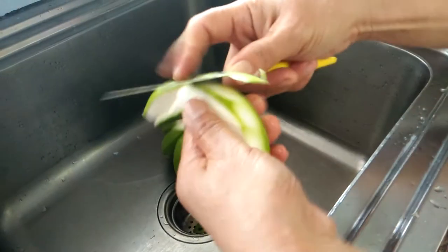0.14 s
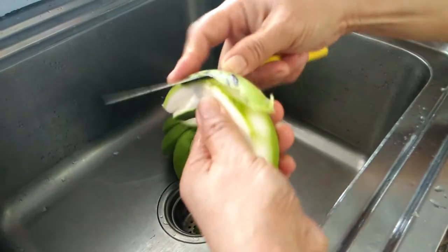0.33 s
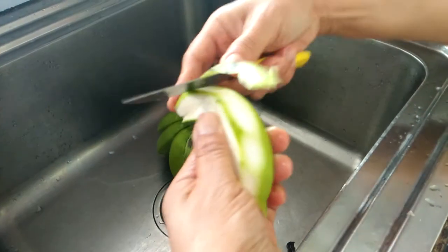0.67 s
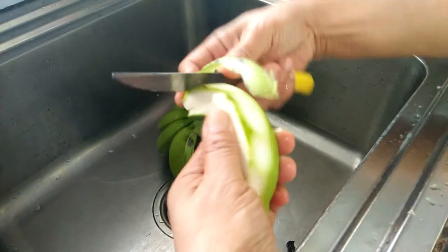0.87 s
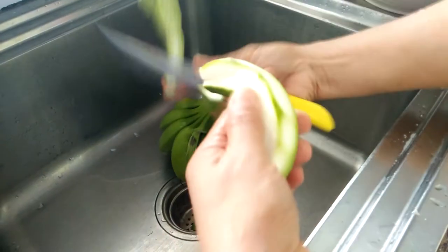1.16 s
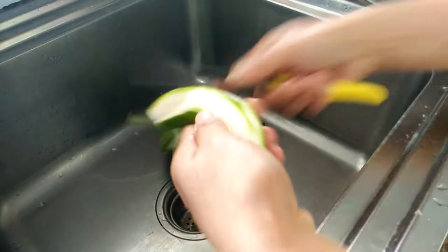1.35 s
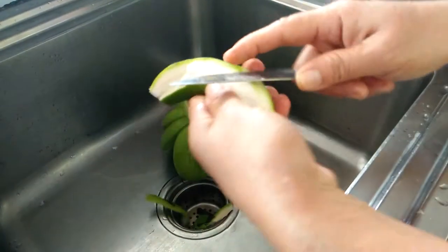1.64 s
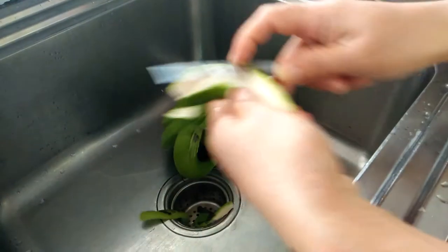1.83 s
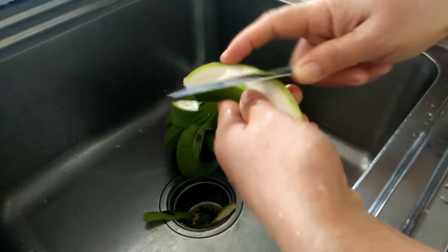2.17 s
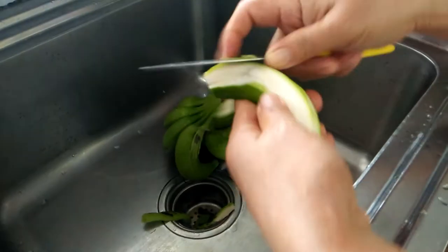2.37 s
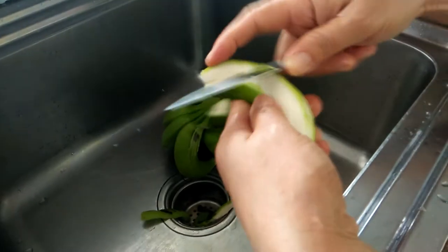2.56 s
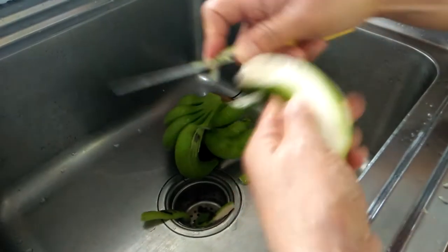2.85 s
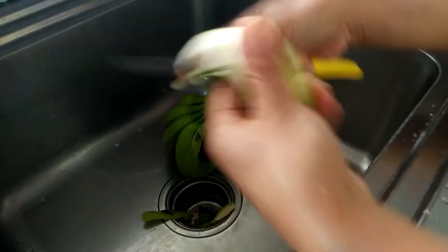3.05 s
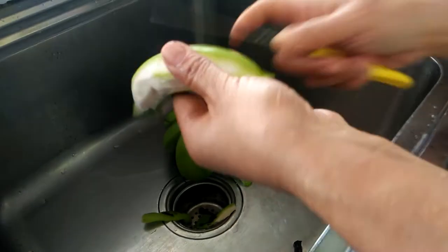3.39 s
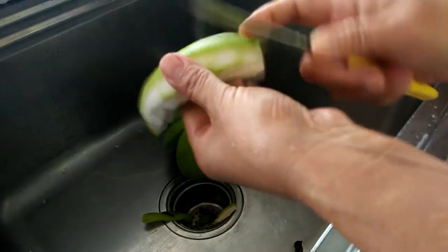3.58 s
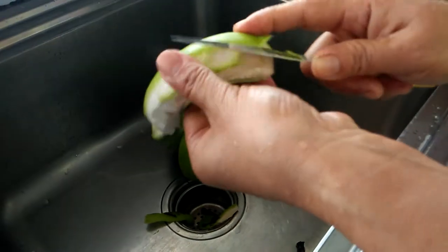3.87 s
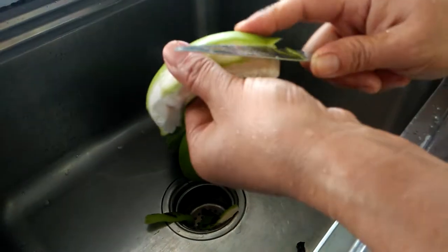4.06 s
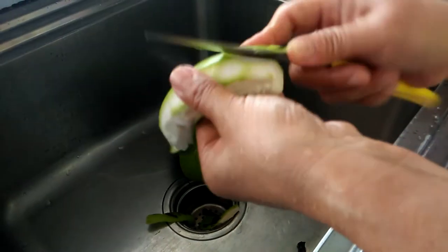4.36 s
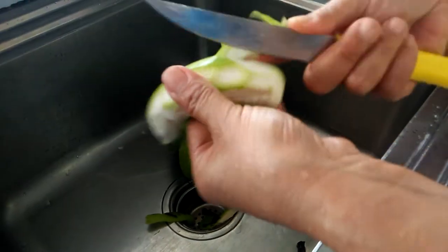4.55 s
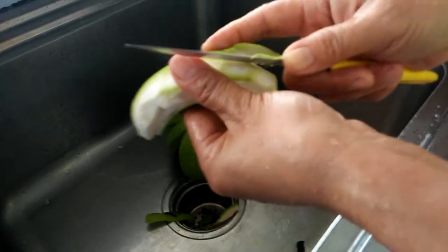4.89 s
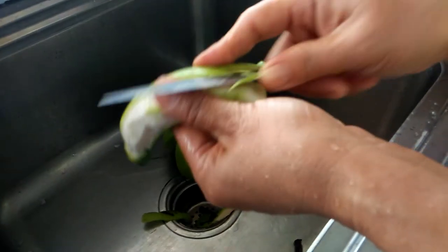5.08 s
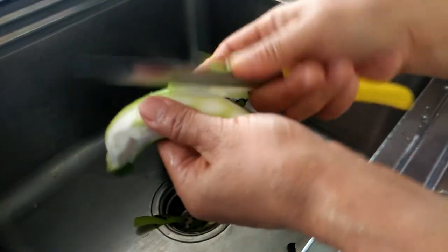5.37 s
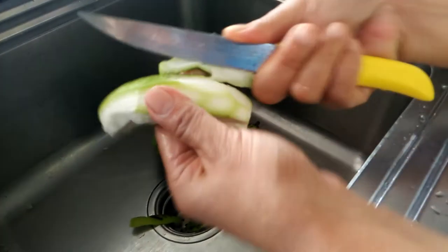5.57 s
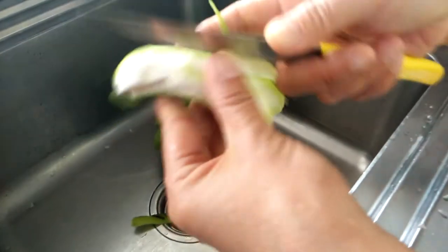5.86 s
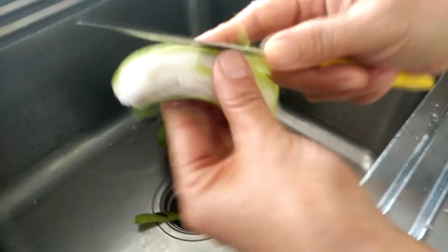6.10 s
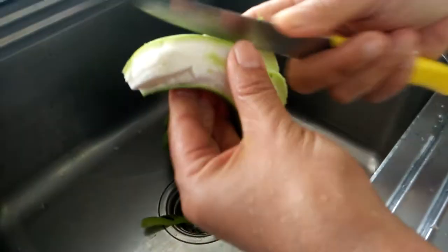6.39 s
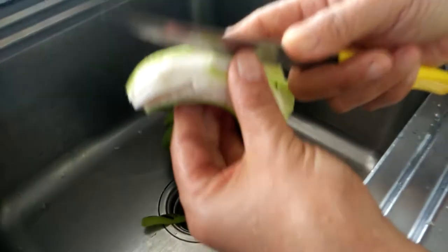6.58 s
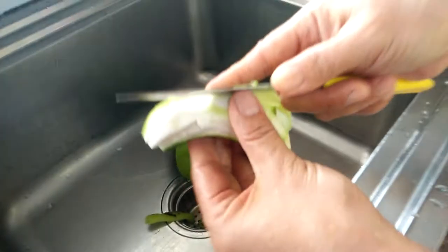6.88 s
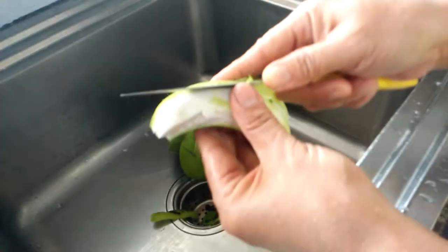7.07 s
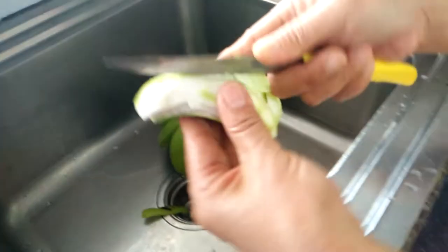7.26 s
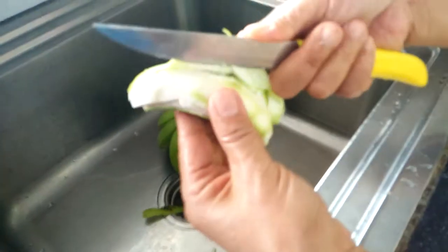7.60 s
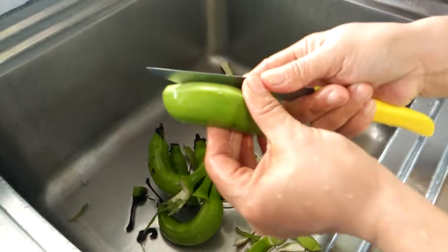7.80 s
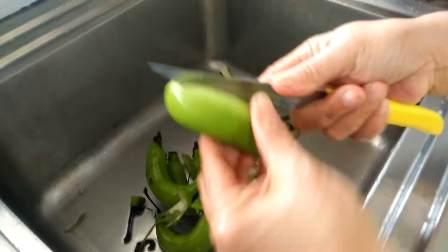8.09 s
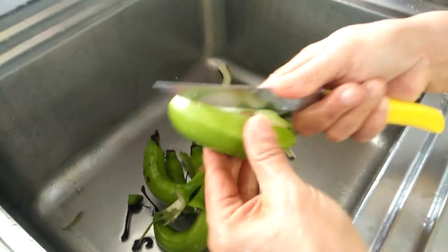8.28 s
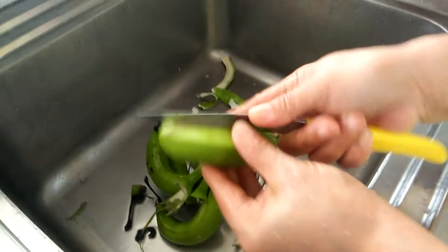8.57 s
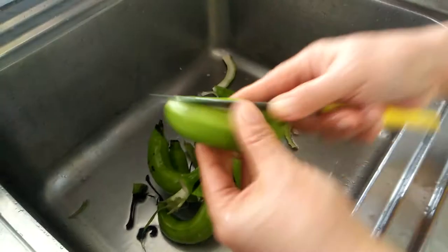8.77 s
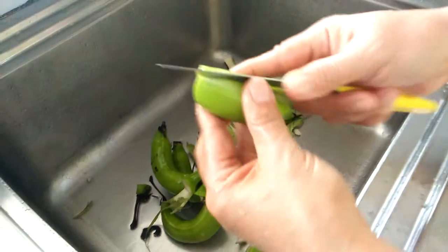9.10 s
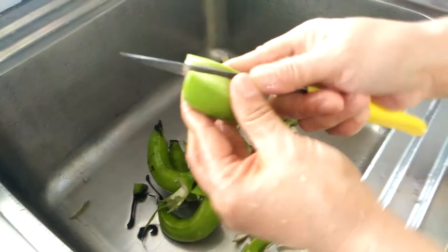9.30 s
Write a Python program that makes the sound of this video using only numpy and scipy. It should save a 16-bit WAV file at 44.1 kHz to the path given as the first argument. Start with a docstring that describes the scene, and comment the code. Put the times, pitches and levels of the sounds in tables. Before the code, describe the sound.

In a small, hard, ringing kitchen, a knife quietly tears strips of green banana skin while a little bird chirps faintly outside. Suddenly a pan lid crashes out of sight, a steel pot knocks, slides and rolls, and a tray rattles to rest. Peeling then resumes with sharper fibre snaps, short rips and wet pops. The close handheld microphone picks up soft low bumps over quiet room air and a faint appliance hum.

```python
"""In a ringing kitchen, a knife peels green bananas over a steel sink. Strips of skin rip as swells of
tiny random snaps, lone fibres crack as millisecond noise bursts, and wet skin pops through resonances.
Out of sight, a lid, a pot and a tray crash, rattle and slide: noise bursts and skids ring metal modes.
A small bird chirps outside in wavering sine notes; the handheld microphone takes soft bumps of low
filtered noise, and an appliance hums faintly as narrow bands of noise."""
import sys
import numpy as np
from scipy import signal
from scipy.fft import rfft, irfft
from scipy.io import wavfile
from scipy.ndimage import uniform_filter1d, minimum_filter1d

SR = 44100
rng = np.random.default_rng(int(sys.argv[2]) if len(sys.argv) > 2 else 0)


def master(y):
    """Save y as 16-bit WAV."""
    cut = np.clip(np.atleast_2d(y).T, -1, 1)
    pcm = np.round(cut * 32767)  # scale
    wavfile.write(sys.argv[1], SR, pcm.astype(np.int16))


N = 416304

# strips of skin tearing: (time [s], nominal length [s], level [dB])
STRIPS = [(0.036, 0.073, -50), (0.277, 0.0221, -54), (0.328, 0.042, -45.5), (0.443, 0.034, -58.5),
          (0.685, 0.0331, -51.5), (0.83, 0.0299, -43), (0.872, 0.122, -58), (0.99, 0.0236, -41.5),
          (1.1, 0.054, -62), (1.348, 0.0272, -58.5), (1.521, 0.0815, -64.5), (1.742, 0.0334, -69.5),
          (1.882, 0.1056, -57.5), (2.274, 0.0566, -58.5), (2.631, 0.097, -66), (2.857, 0.0222, -44.5),
          (4.419, 0.0305, -38.5), (5.131, 0.0507, -61.5), (5.189, 0.0335, -55), (5.251, 0.01855, -39),
          (5.389, 0.0406, -44.5), (5.452, 0.0298, -36.5), (5.509, 0.0457, -40), (6.163, 0.041, -48.5),
          (6.533, 0.0498, -75), (7.014, 0.0301, -41.5), (7.248, 0.0493, -42.5), (7.317, 0.16, -56.5),
          (7.456, 0.205, -57.5), (7.698, 0.0393, -49), (8.042, 0.0843, -52), (8.213, 0.0339, -55),
          (8.646, 0.0704, -63), (9.198, 0.0403, -51), (9.42, 0.0191, -50)]
# tone of the crisp skin: (frequency [Hz], level [dB])
SKIN_TONE = [(1650, -38), (2800, -15), (3150, -18), (3490, -11), (6390, -1.5), (7700, 1.5), (10100, -3),
             (13700, 0), (14500, -2)]
# tone of the dull flesh: (frequency [Hz], level [dB])
FLESH_TONE = [(410, -49), (700, -21.5), (959, -9), (1110, -15), (1330, -25.5), (1470, -6), (2040, 2),
              (2560, 0), (3510, -9), (4200, -5), (5460, -39), (9240, -120)]


def undb(db):
    """Turn decibels into a gain."""
    return 10 ** (np.asarray(db) / 20)


def unit(x):
    """Scale a sound to rms 1."""
    return x / np.sqrt(np.mean(x ** 2) + 1e-24)


def clock(length):
    """Sample times of a short sound, in seconds."""
    return np.arange(int(length * SR) + 2) / SR


def fade(t, t60):
    """Die away exponentially, 60 dB down after t60 seconds."""
    return np.exp(-np.log(1000) * t / t60)


def add(track, s, x):
    """Mix x into the track from s seconds on."""
    i = max(int(s * SR), 0)
    track[i:i + len(x)] += x[:max(N - i, 0)]


def colour(x, points):
    """Shape the tone through (frequency [Hz], level [dB]) points, with no sound ahead of its cause."""
    size = 2048
    hz, db = np.transpose(points)
    bins_hz = np.arange(size // 2 + 1) * SR / size
    gain = undb(np.interp(np.log(bins_hz + 1), np.log(hz), db))
    # folding the cepstrum makes the filter minimum-phase
    cepstrum = irfft(np.log(gain))
    cepstrum[1:size // 2] *= 2
    cepstrum[size // 2 + 1:] = 0
    impulse = irfft(np.exp(rfft(cepstrum)))
    return signal.fftconvolve(x, impulse)[:len(x)]


def resonate(x, hz, width):
    """One resonance, width in Hz, with gain 1 at its centre."""
    return signal.lfilter(*signal.iirpeak(hz, hz / width, fs=SR), x)


def above(x, hz, order=2):
    """Keep what lies above a frequency (high-pass)."""
    return signal.sosfilt(signal.butter(order, hz, "high", fs=SR, output="sos"), x)


def grains(t, rate, spread_db):
    """Random tiny impacts of very unequal size, about `rate` a second, scaled to rms 1."""
    hits = rng.random(len(t)) < rate / SR
    sizes = rng.standard_normal(len(t)) * undb(spread_db * rng.standard_normal(len(t)))
    return unit(hits * sizes)


def kitchen(x, wet_db, t60, side_db):
    """Direct sound plus a dense tail off steel and tile; only the treble differs between the ears."""
    t = clock(.5)
    tails = rng.standard_normal((2, len(t))) * fade(t, t60) * np.minimum(t / 0.005, 1)
    mid, side = (signal.fftconvolve(x, tail / np.linalg.norm(tail))[:N] * undb(wet_db) for tail in tails)
    side = undb(side_db) * above(side, 5500, order=10)
    return (x + mid + np.array([side, -side])) / np.sqrt(1 + undb(2 * wet_db))


def background():
    """Quiet room air is coloured noise; an appliance's wavering hum is noise through narrow resonances."""
    # tone of the air: (frequency [Hz], level [dB])
    air_tone = [(15, -40.5), (25, -12.5), (54, -7), (127, -10), (170, -5), (222, -28.5), (314, -17),
                (388, -13), (818, -12.5), (934, -11.5), (1290, -16.5), (1630, -15), (2130, -22.5),
                (14500, -38.5)]
    # hum bands: (frequency [Hz], width of each of two resonances in a row [Hz], level [dB])
    hum_bands = [(312.7, 14, -80), (615, 16, -85), (851, 20, -85), (1276.4, 31, -82.5)]
    out = undb(-73) * unit(colour(rng.standard_normal(N), air_tone))
    for hz, width, db in hum_bands:
        once = resonate(rng.standard_normal(N), hz, width)
        out += undb(db) * unit(resonate(once, hz, width))
    return out


def bumps():
    """Soft knocks and rubs push on the microphone body, which answers with low, broad resonances."""
    # bumps: (time [s], nominal length [s], level [dB], frequency [Hz])
    pushes = [(0.476, 0.175, -67, 58.3), (1.339, 0.177, -57.5, 95.5), (1.531, 0.246, -61.5, 92),
              (3.196, 0.0776, -55, 60), (4.06, 0.115, -59, 111.6), (6.08, 0.123, -62.5, 65.13),
              (6.542, 0.355, -68, 62.1), (7.232, 0.166, -65.5, 65.1), (7.615, 0.092, -60, 56.8)]
    out = np.zeros(N)
    for s, length, db, hz in pushes:
        t = clock(1.3 * length)
        push = rng.standard_normal(len(t)) * np.minimum(t / 0.0073, 1)
        body = resonate(resonate(push, hz, width=0.95 * hz), hz, width=hz)
        add(out, s, undb(db) * unit(body * (1 - t / t[-1])))
    return out


def bird():
    """Short falling sine notes with a fast, uneven waver in pitch and a slower flutter in strength."""
    # notes: (time [s], length [s], start pitch [Hz], end pitch [Hz], level [dB])
    notes = [(0.506, 0.0806, 4600, 4280, -66.5), (0.695, 0.0943, 4500, 4270, -62),
             (0.847, 0.093, 4350, 4150, -57), (1.037, 0.059, 5300, 4750, -64.5),
             (1.293, 0.1174, 5370, 5200, -64.5), (1.447, 0.1547, 4400, 3830, -60.5),
             (1.646, 0.13, 4830, 4490, -60.5), (1.87, 0.119, 4840, 4180, -57.5),
             (2.116, 0.0755, 5500, 5200, -68.5), (2.649, 0.14, 4780, 4410, -63),
             (2.949, 0.061, 4520, 4420, -68.5), (5.69, 0.064, 5235, 4770, -71.5),
             (6.874, 0.096, 5180, 4550, -60), (6.958, 0.0646, 4450, 3650, -53.5),
             (8.423, 0.074, 4750, 4150, -70)]
    waver_share, flutter_db = .03, 5.5  # rms share of the pitch, rms dB
    out = np.zeros(N)
    for s, length, start_hz, end_hz, db in notes:
        t = clock(length)
        u = t / t[-1]
        waver = unit(uniform_filter1d(rng.standard_normal(len(t)), size=40))
        flutter = unit(uniform_filter1d(rng.standard_normal(len(t)), size=300))
        hz = (start_hz + (end_hz - start_hz) * u) * (1 + waver_share * waver)
        strength = np.abs(np.sin(np.pi * u)) ** 0.48 * undb(flutter_db * flutter)
        add(out, s, undb(db) * unit(strength * np.sin(2 * np.pi * np.cumsum(hz) / SR)))
    return out


def struck(blows, modes, ring, modes_db, cluster_db, ring_t60, crack_db, rattle_s, attack_s):
    """Each blow chatters briefly and rings a few clear modes, their close neighbours and dense ones."""
    strike_spread_db = 5  # a mode's strength differs by up to this much either way
    out, t = np.zeros(N), clock(0.884)
    early = t < .04  # levels are set over the first 40 ms
    hz, db, t60 = np.transpose(modes)[:, :, None]
    partials = undb(db) * fade(t, t60) * np.exp(2j * np.pi * hz * t) * np.minimum(t / .002, 1)
    # a crowd of modes lies within a few percent of each clear one
    width, brief = .03 * hz, clock(.04)
    crowd = undb(db) * np.sqrt(width) * np.exp(-np.pi * width * brief) * np.cos(2 * np.pi * hz * brief)
    clusters = above(np.sum(crowd, axis=0), .8 * hz.min())
    for s, level_db, treble_db in blows:
        chatter = undb(crack_db) * grains(t, 1500, 3) * np.exp(-t / rattle_s)
        shake = chatter + rng.standard_normal(len(t)) * fade(t, ring_t60)
        dense = colour(shake, ring)
        close = signal.fftconvolve(shake, clusters)[:len(t)]
        # each blow lands on another spot and favours other modes
        favour = undb(strike_spread_db * (2 * rng.random(len(modes)) - 1))
        phases = np.exp(2j * np.pi * rng.random(len(modes)))
        clear = np.imag(favour * phases @ partials)
        shares = [(0, dense), (cluster_db, close), (modes_db, clear)]
        blow = sum(undb(share_db) * part / part[early].std() for share_db, part in shares)
        blow = blow * np.minimum(t / attack_s, 1)
        # each blow has its own treble: bright and clattering, or dull
        blow = colour(blow / blow[early].std(), [(2200, 0.0033), (4200, treble_db)])
        add(out, s, undb(level_db) * blow)
    return out


def counter():
    """Things set down on the counter: soft-edged blows on a few low modes."""
    # modes: (frequency [Hz], level [dB], 60 dB decay [s])
    modes = [(276.95, -13, 1.04), (337, -4, 0.0157), (781, -2, 0.65), (982.9, 8.5, 0.16), (1733, 2.5, 0.67),
             (1857, -5, 1)]
    # dense ring: (frequency [Hz], level [dB])
    ring = [(130, -45.5), (230, -24.5), (310, -0.5), (450, -6), (800, 1.5), (1100, -1), (1800, -3),
            (2500, -14), (5000, -18), (9000, -20.5), (14500, -34.5)]
    # blows: (time [s], level [dB], treble [dB])
    blows = [(2.785, -39.5, -2), (2.83, -45.5, -4.5), (3.193, -39, -16), (4.064, -38, 13)]
    return struck(blows, modes, ring, modes_db=-11.5, cluster_db=-10.5, ring_t60=.42, crack_db=-4.5,
                  rattle_s=0.01, attack_s=0.013)


def popping(pops, width_share):
    """Soft contacts: a dying noise burst passes twice through one broad resonance."""
    out, t = np.zeros(N), clock(0.41)
    for s, peak_db, hz, decay in pops:
        width = width_share * hz
        burst = rng.standard_normal(len(t)) * np.exp(-t / decay)
        pop = resonate(resonate(burst, hz, width), hz, width)
        add(out, s, undb(peak_db) * pop / np.abs(pop).max())
    return out


def counter_thuds():
    """The counter's dull thud under the things set down: low bursts with the deepest bass removed."""
    # thuds: (time [s], level [dB], frequency [Hz], decay time constant [s])
    thuds = [(2.788, -52.5, 309, 0.031), (3.194, -29.5, 342.2, 0.029), (4.066, -31, 318, 0.04)]
    return above(popping(thuds, width_share=0.76), 260, order=6)


def lid():
    """A pan lid crashes: sharp blows on thin, ringing metal."""
    # modes: (frequency [Hz], level [dB], 60 dB decay [s])
    modes = [(1084, -5, .5), (1238, -11, .45), (1321, -12, .4), (1508, -10, .45), (1988, -7, .35),
             (2303, 3, .5), (2799, -15, .55), (3352, -11, .5), (3608, -9, .4), (3850, -9, .35),
             (5059, -6, .45), (7730, -14, .3), (9254, -15, .45)]
    # dense ring: (frequency [Hz], level [dB])
    ring = [(120, -69), (200, -42), (809, -19.5), (1100, -3), (2130, -6.5), (2250, -1.5), (2640, -27),
            (2790, -12.5), (3990, -10), (4690, -21), (5220, -12), (6590, -15), (9260, -15), (12800, -22.5),
            (14500, -29)]
    # blows: (time [s], level [dB], treble [dB])
    blows = [(3.192, -10.5, 0), (3.211, -16.5, 3), (3.238, -17, -4.5), (3.262, -18, -6),
             (3.378, -22.5, 7.5), (3.409, -22.5, 3)]
    return struck(blows, modes, ring, modes_db=-2.0, cluster_db=-4, ring_t60=.38, crack_db=-1.5,
                  rattle_s=.018, attack_s=.001)


def rolling(count):
    """The pot rolls on, knocking ever slower and softer; knocks as (time [s], level [dB], treble [dB])."""
    start_s, first_gap_s, slowing = 3.748, .061, 1.2  # each gap is `slowing` times the last
    start_db, fall_db_per_s, treble_db = -31, 10, 1.5
    delays = first_gap_s * np.cumsum(np.r_[0, slowing ** np.arange(count - 1)])
    return [(start_s + delay, start_db - fall_db_per_s * delay, treble_db) for delay in delays]


def pot():
    """A steel pot is knocked and then rolls: very sharp blows with a long dense ring."""
    # modes: (frequency [Hz], level [dB], 60 dB decay [s])
    modes = [(933, -6, .45), (1031, 1, .5), (1144, -4, .45), (1181, -1, .45), (1286, -3, .5),
             (1367, -7, .45), (1738, -10, .5), (1991, -8, .5), (2290, -8, .45), (3375, -14, .35),
             (3639, -11, .45), (3850, -9, .4), (4031, -6, .4), (5380, -4, .5), (6519, -10, .4),
             (7284, -11, .45)]
    # dense ring: (frequency [Hz], level [dB])
    ring = [(150, -59), (250, -38.5), (615, -20), (670, -35.5), (1040, -4), (1650, -6.5), (2310, -11.5),
            (2650, -18.5), (3920, -22), (4340, -18.5), (5230, -19.5), (5790, -28), (6310, -13),
            (8860, -25.5), (14500, -30.5)]
    # blows: (time [s], level [dB], treble [dB])
    blows = [(3.370, -18.5, 1.5), (3.478, -19, -21), (3.491, -25.5, 3), (3.556, -24.5, -7),
             (3.571, -25, -23.5), (3.59, -30, -0.5), (3.639, -28, -1.5)]
    return struck(blows + rolling(count=6), modes, ring, modes_db=-7.5, cluster_db=-2.0, ring_t60=0.575,
                  crack_db=-1.0, rattle_s=.007, attack_s=0.00059)


def tray():
    """A steel tray rattles: softer blows with little chatter."""
    # modes: (frequency [Hz], level [dB], 60 dB decay [s])
    modes = [(1296, 0, .45), (1322, -4, .4), (1423, -8, .35), (1728, -1, .4), (1756, 0, .45),
             (1984, -4, .45), (2509, -9, .5), (2832, -9, .45), (3195, -7, .3), (3634, -4, .35),
             (5093, -11, .3), (5862, -8, .3), (7192, -9, .3)]
    # dense ring: (frequency [Hz], level [dB])
    ring = [(150, -58.5), (250, -38), (681, -17.5), (780, -12), (850, -16), (1280, 0), (1510, -9),
            (1760, 2.5), (2160, -15.5), (2790, 4), (3040, -14.5), (3720, -4), (4650, -17.5), (6420, -8.5),
            (14500, -49)]
    # blows: (time [s], level [dB], treble [dB])
    blows = [(4.53, -36.5, 16), (4.575, -31.5, 1), (4.612, -27.5, -18), (4.645, -38.5, 1.5),
             (4.70, -34.5, -1.5), (4.775, -35.5, -8.5), (4.806, -39, -0.5)]
    return struck(blows, modes, ring, modes_db=-5.0, cluster_db=-5, ring_t60=0.3615, crack_db=-15,
                  rattle_s=0.023, attack_s=0.00405)


def sliding(skids, peaks, attack_s, fall_db_per_s):
    """Metal catches and slips on metal, ringing high modes; each skid swells quickly and dies away."""
    t = clock(N / SR)[:N]
    slips = grains(t, 1900, 3)
    body = np.zeros(N)
    for k, (hz, width, db) in enumerate(peaks):
        body += (-1) ** k * undb(db) * resonate(slips, hz, width)  # neighbours take opposite signs
    pressure = []
    for s, db in skids:
        swell = np.clip(1 + (t - s) / attack_s, 0, 1)  # full at s
        pressure.append(swell * undb(db - fall_db_per_s * np.maximum(t - s, 0)))
    return unit(above(body, 2552)) * np.linalg.norm(pressure, axis=0)


def pot_skids():
    """The pot slides over metal."""
    # skids: (time [s], level [dB])
    skids = [(3.5, -30.5), (3.665, -34), (3.77, -34.5), (3.89, -29), (4.09, -40)]
    # resonances: (frequency [Hz], width [Hz], level [dB])
    peaks = [(3724, 250, 8.5), (4090, 150, -8.5), (5197, 130, 0.5), (6300, 210, 1.5), (7303, 340, 4),
             (8070, 140, 1), (8856, 450, 4), (10320, 130, 1.5), (11636, 1100, -5.5), (13400, 500, -7.5)]
    return sliding(skids, peaks, attack_s=0.02, fall_db_per_s=55.5)


def tray_skids():
    """The tray skids as it comes to rest, each skid dying quickly."""
    # skids: (time [s], level [dB])
    skids = [(4.535, -36.5), (4.62, -29.5), (4.79, -38.5)]
    # resonances: (frequency [Hz], width [Hz], level [dB])
    peaks = [(3360, 990, 0.5), (5300, 540, -4), (5700, 370, -6.5), (6450, 450, -1), (7280, 530, 2),
             (8720, 1210, 1), (12060, 2800, -8)]
    return sliding(skids, peaks, attack_s=0.036, fall_db_per_s=168)


def wet_pops():
    """Short pitched pops and squelches of wet skin."""
    # pops: (time [s], peak level [dB], frequency [Hz], decay time constant [s])
    pops = [(1.605, -48, 1014, 0.0068), (2.295, -52, 2480, 0.02), (2.43, -56, 745, 0.021),
            (2.64, -47.5, 2520, 0.022), (4.388, -27.5, 2184, 0.0171), (6.705, -61.5, 4520, 0.00201),
            (7.022, -29, 2527, 0.013), (8.045, -47, 757, 0.014), (8.219, -38, 2870, 0.0063),
            (9.12, -57, 648, 0.036), (9.203, -45.5, 978, 0.0147), (9.424, -35.5, 2300, 0.0025)]
    return popping(pops, width_share=0.37)


def blade_depth(s):
    """How deep the blade runs, as the level of the dull flesh against the crisp skin at time s, in dB."""
    # depth over time: (time [s], level [dB])
    depths = [(0, -11), (.45, -15.5), (.85, -24.5), (1.0, -26.5), (1.3, 0), (1.9, -10), (2.6, -0.5),
              (2.9, -16.5), (5.4, -25), (5.52, -11.5), (6.17, -3), (6.55, 4.5), (7.02, -10.5),
              (7.25, -16.5), (7.5, -5), (9.4, -5.5)]
    return np.interp(s, *np.transpose(depths))


def tearing():
    """A strip of skin gives way: a swell of fibre snaps, crisp at the surface and duller in the flesh."""
    lead_s, lead_db = 0.098, -19  # the blade works faintly into the skin before each strip gives way
    catch_s, catch_db = .006, 3  # the blade catches and jumps every few milliseconds
    crisp, flesh = np.zeros(N), np.zeros(N)
    leads = [(s - lead_s / 2, lead_s, db + lead_db) for s, length, db in STRIPS]
    for s, length, db in STRIPS + leads:
        t = clock(1.183 * length)
        swell = np.abs(np.sin(np.pi * t / t[-1])) ** 3.3
        catches = np.arange(0, t[-1] + catch_s, catch_s)
        jumps = np.interp(t, catches, rng.standard_normal(len(catches)))
        swell = swell * undb(catch_db * jumps)
        start = s - 0.14 * length
        add(crisp, start, undb(db) * unit(swell * grains(t, 3000, 3)))
        # every strip has its own hollow note
        pulp = swell * grains(t, 1200, 1.2)
        hollow = resonate(pulp, rng.uniform(2100, 3400), 350)
        add(flesh, start, undb(db + blade_depth(s)) * unit(pulp + hollow))
    # dividing by coloured white noise evens out the loudness of the two tones
    white = rng.standard_normal(N)
    skin_layer = colour(crisp, SKIN_TONE) / colour(white, SKIN_TONE).std()
    flesh_layer = colour(flesh, FLESH_TONE) / colour(white, FLESH_TONE).std()
    return skin_layer + flesh_layer


def lesser_snaps(count):
    """Lesser fibres snap at random while a strip tears; snaps as (time [s], level [dB])."""
    snaps_per_s, over_db, spread_db = 32, 10, 2.5  # level above the strip's own, and its scatter
    snaps = []
    for s, length, db in STRIPS:
        delays = np.cumsum(rng.exponential(1, count)) / snaps_per_s
        scatter = 2 * rng.random(count) - 1
        for delay, luck in zip(delays, scatter):
            if delay < length:
                snaps.append((s + delay, db + over_db + spread_db * luck))
    return snaps


def cracking():
    """A stiff fibre snaps at the blade in a millisecond and knocks the blade and the fruit."""
    # cracks: (time [s], level [dB])
    cracks = [(1.351, -32.5), (5.25, -29), (5.358, -28.5), (5.3862, -17), (5.3962, -13), (5.5315, -19.5),
              (6.1883, -31), (7.0257, -19.5), (7.215, -37), (7.2519, -19), (7.4325, -27), (7.503, -30.5),
              (7.574, -26), (7.9331, -27.5), (8.0268, -29), (8.0548, -26.5), (8.146, -24.5),
              (8.1946, -23.5), (8.33, -23), (8.5497, -42.5), (9.2021, -32.5), (9.425, -18.5)]
    knock_db, knock_per_depth = -12, 0.765  # the fruit is knocked harder the deeper the blade runs
    out, t = np.zeros(N), clock(.04)
    for s, peak_db in cracks + lesser_snaps(count=6):
        snap = rng.standard_normal(len(t)) * fade(t, 0.0116)
        tick, knock = colour(snap, SKIN_TONE), colour(snap, FLESH_TONE)
        flesh_db = knock_db + knock_per_depth * blade_depth(s)
        both = tick / np.abs(tick).max() + undb(flesh_db) * knock / np.abs(knock).max()
        add(out, s, undb(peak_db) * both)
    return out


def scene():
    """Mix the layers, each with its own share of the room; air, hum and bumps stay dry."""
    out = kitchen(bird(), wet_db=-2, t60=0.5, side_db=-9.5) + bumps() + background()
    ware = lid() + pot() + tray() + counter() + counter_thuds()
    out += kitchen(ware, wet_db=-6, t60=.36, side_db=0)
    out += kitchen(pot_skids() + tray_skids(), wet_db=-1.0, t60=0.22, side_db=-5)
    out += kitchen(tearing() + wet_pops(), wet_db=-2, t60=0.36, side_db=-6)
    return out + kitchen(cracking(), wet_db=-3, t60=0.369, side_db=-7.5)


def record(dry):
    """A quick limiter holds the loudest peaks; then everything above 14450 Hz is cut."""
    gain = np.minimum(1, .75 / (np.abs(dry).max(axis=0) + 1e-9))
    gain = uniform_filter1d(minimum_filter1d(gain, size=600), size=600)
    top_cut = signal.ellip(12, .2, 80, 14450, fs=SR, output="sos")
    return signal.sosfilt(top_cut, dry * gain)


dry = scene()
out = record(dry)
master(out)
```